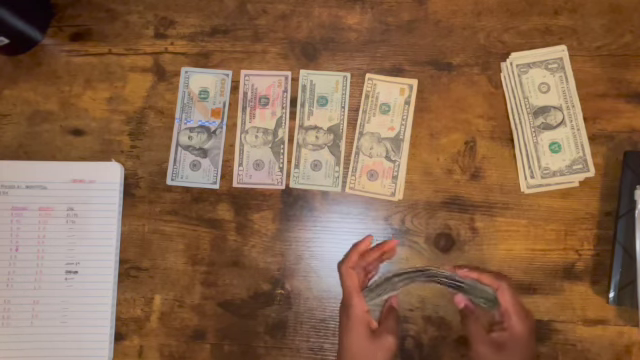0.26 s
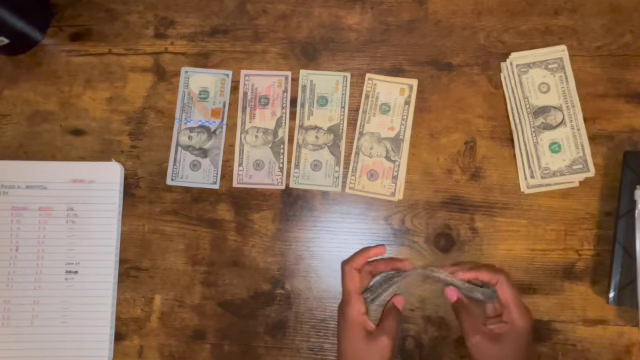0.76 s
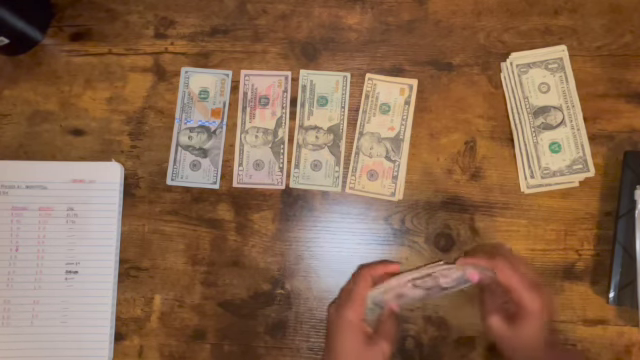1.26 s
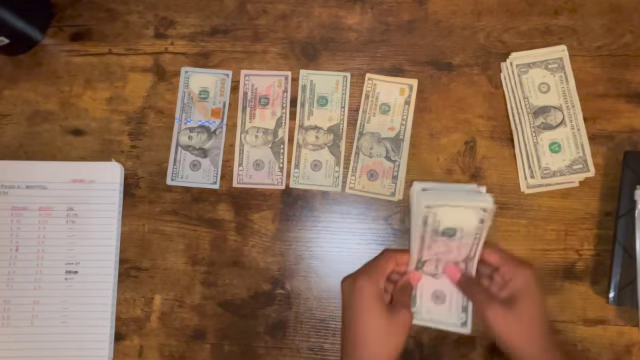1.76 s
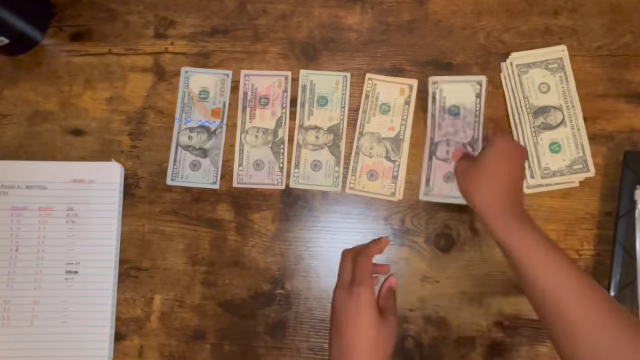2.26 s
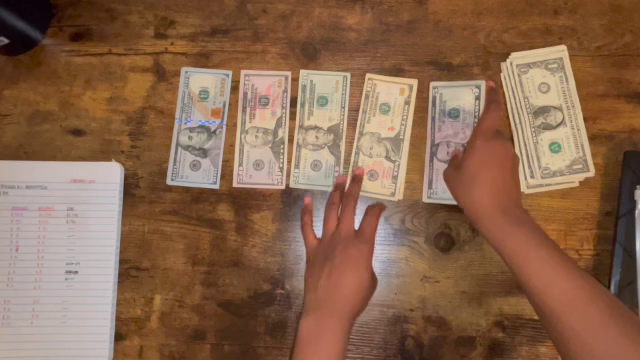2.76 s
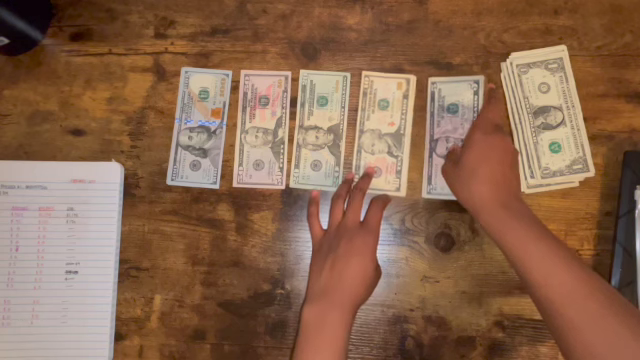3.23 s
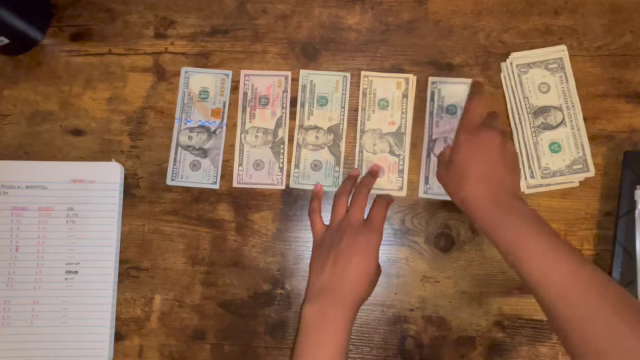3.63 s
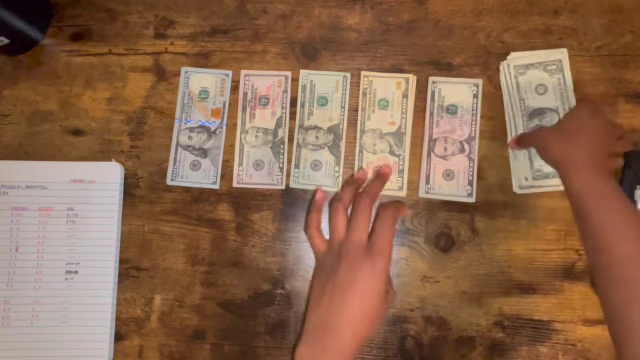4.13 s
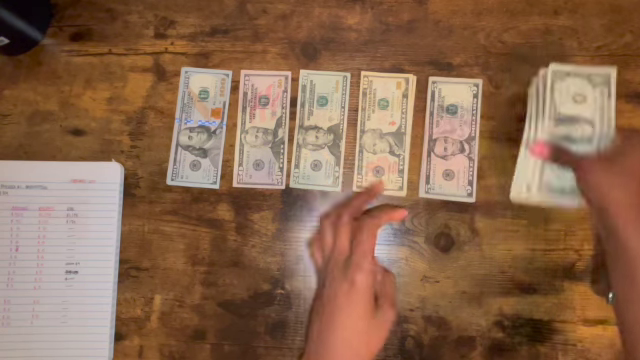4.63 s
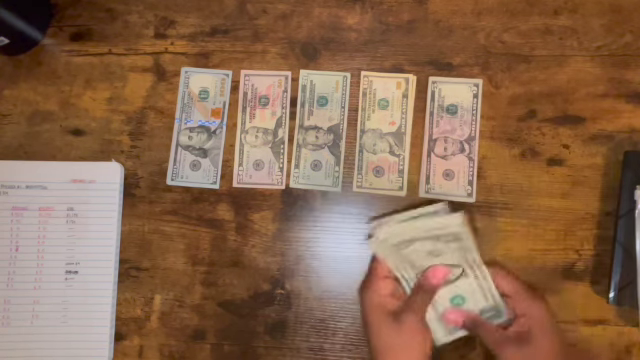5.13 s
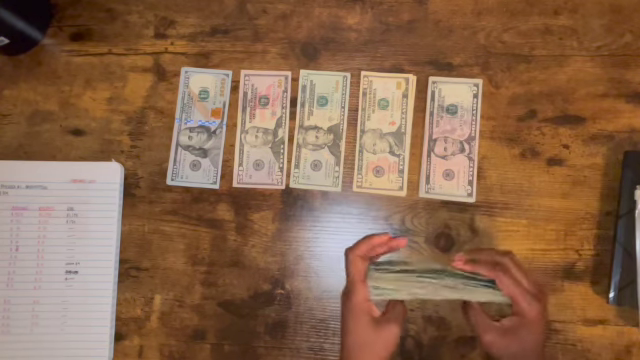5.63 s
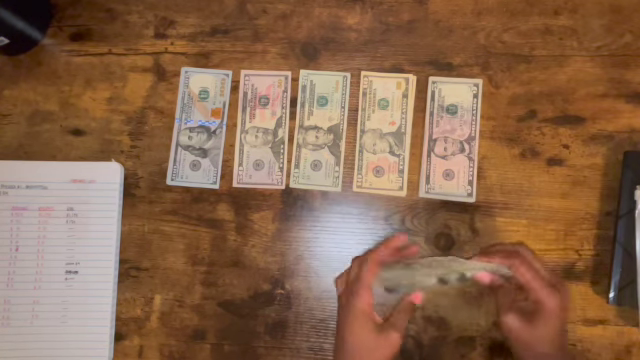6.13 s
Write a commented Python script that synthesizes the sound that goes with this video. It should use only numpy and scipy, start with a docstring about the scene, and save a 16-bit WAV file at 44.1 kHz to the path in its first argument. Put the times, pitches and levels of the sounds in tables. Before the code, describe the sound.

A quiet small room with faint low rumble, heard close in stereo. At once a stack of paper notes lands on a wooden table: a quick cluster of clicks and a low boom, with paper sliding after. A softer tap and thud come at 0.5 seconds, a sharp clack at 0.84. From 1.0 to 1.9 dry paper slides, faint crackles and small ticks. Soft finger knocks land at 2.1 and 2.4, more at 2.7 and 3.0, with fingertips dragging dully on wood. It is nearly silent until about 4.0, when firmer hand knocks press paper, strongest at 4.14. Rustles and crisp flicks follow, a bright one at 4.77, then a longer slide and faint crackle around 5.0. At 5.42 to 5.48 the second stack hits in the loudest burst of clacks with a deep woody thud and short room ring. A snap at 5.53 and light rustling carry to the end.

```python
"""Paper slides and a stack of banknotes lands on a wooden table: a quick cluster of clicks and a low boom.
The stack is squared, one note is laid down, and a second stack is picked up and squared.
Random clicks make the note edges, fading sine tones the ring after each blow, filtered random slips the paper.
Single pops make the creases. Fingers and hands knock and drag on the wood.
A small, lively room answers, heard by two closely spaced microphones."""
import sys
import numpy as np
from scipy import signal
from scipy.fft import rfft, irfft
from scipy.io import wavfile
from scipy.ndimage import uniform_filter1d

SR = 44100
rng = np.random.default_rng(int(sys.argv[2]) if len(sys.argv) > 2 else 0)


def wrap_up_sound(samples):
    """Save the sound to the file named by the first command line argument, as 16-bit audio."""
    columns = np.atleast_2d(samples).T
    # keep every value between -1 and 1, then stretch to whole-number steps
    tamed = np.clip(columns, -1, 1)
    steps = np.round(tamed * 32767).astype(np.int16)
    wavfile.write(sys.argv[1], SR, steps)


N = 282107

# Event levels below are set before each source's own overall gain.
# The stack lands on its edge:
# start_s, paper_level_db, gather_s (edges build up), spread_s (edges die out), tilt_db_per_octave, thump_level_db
STACK_TAPS = [(0.0275, -17, 0.0074, 0.005, -1, -24), (0.5303, -28, 0.00075, 0.0035, -1.5, -40),
              (0.8423, -14.5, 0.0003, 0.0036, -2, -18), (5.4229, -13, 0.017, 0.0024, 1.5, -33),
              (5.4613, -6.5, 0.0021, 0.0045, 1.5, -28), (5.4754, -11.5, 0.00082, 0.0051, -0.5, -36)]
# A hand, or the bulk of the stack, meets the table (a low pitch is a soft blow):
# start_s, level_db, pitch_hz (first finger), fingers (count), heel_level_db, pressed_paper_level_db
HAND_KNOCKS = [(0.527, -48, 204, 1, -25.5, -81), (2.134, -26.5, 157, 3, -50, -76),
               (2.363, -33, 276, 1, -35, -42), (2.703, -25, 507, 2, -31, -34.5),
               (2.978, -20, 151, 1, -54, -56), (4.014, -14.5, 283, 3, -26, -22.5),
               (4.137, -11.5, 352, 2, -11.5, -37), (4.998, -33.5, 400, 1, -36, -56),
               (5.4211, -24, 680, 2, -50, -47), (5.4407, -8, 161, 1, -48, -67)]
# A wad of notes is bent and crackles: start_s, length_s, crackle_level_db, pitch_hz (centre)
CRUMPLES = [(1.035, .06, -50.5, 1820), (1.715, 0.05, -47.5, 3200), (4.149, 0.079, -42, 2100),
            (4.957, 0.069, -43.5, 2440), (5.119, 0.036, -42, 1860)]
# A note buckles or flicks: start_s, level_db, pitch_hz (centre)
SNAPS = [(0.395, -29, 1910), (1.175, -33.5, 790), (1.2648, -34, 1430), (1.559, -31, 770),
         (1.768, -34, 5440), (2.3406, -31, 4900), (2.693, -37, 2100), (2.7047, -33.5, 2600),
         (3.6162, -36, 1870), (4.0113, -30.5, 3170), (4.1348, -24, 2300), (4.4732, -28.5, 4270),
         (4.4965, -24, 1670), (4.5535, -31.5, 5600), (4.7669, -20, 6400), (4.9976, -24.5, 2100),
         (5.5332, -19, 3440), (6.0988, -32.5, 1630), (6.298, -35, 1030)]
# Paper slides, and light, quick strokes are bright;
# the bright burst at 4.767 s is the room's answer to a flicked note:
# start_s, rise_s, hold_s, level_db, tilt_db_per_octave
SLIDES = [(.005, 0.025, 0.29, -36, -4), (.41, 0.031, 0.07, -31.5, -5), (.61, 0.049, 0.048, -41.5, 0.5),
          (.99, 0.052, 0.056, -34, -3), (1.12, 0.054, 0.034, -31, -0.5), (1.385, 0.11, 0.03, -33, 3.5),
          (1.667, 0.00049, 0.038, -38.5, 1.5), (1.712, 0.0035, 0.026, -33.5, 0.5),
          (1.81, 0.017, 0.021, -40, 0.5), (2.11, 0.029, 0.18, -47.5, -1), (2.22, 0.07, 0.017, -42.5, -0.5),
          (2.72, 0.023, 0.068, -40.5, -9.5), (3.33, 0.084, 0.028, -55, 1.5),
          (3.53, 0.084, 0.022, -47.5, -0.5), (4.065, 0.042, .06, -34.5, -1.5),
          (4.26, 0.049, 0.012, -36, -3), (4.435, 0.034, 0.086, -31.5, -1),
          (4.767, 0.0035, 0.0085, -33.5, 5), (4.912, 0.0038, 0.28, -36.5, 2),
          (4.91, 0.073, 0.027, -28.5, -2.5), (5.2, 0.054, 0.031, -30, 3.5), (5.55, 0.045, 0.069, -32, -3.5),
          (5.75, 0.03, 0.019, -47.5, -1), (5.86, 0.071, 0.1, -38.5, -1.4), (6.11, 0.059, 0.051, -47, 5),
          (6.225, 0.074, 0.087, -34.5, 2)]
# Loudness curve of fingertips dragging over the wood: time_s, level_db
DRAG_CURVE = [(2.705, -14.5), (2.76, -33), (2.82, -26), (2.9, -39), (2.96, -29), (3.08, -46.5), (3.31, -52)]
# Ringing pitches heard after the blows: the table's low boom and thin high tones of table and room:
# pitch_hz, level_db, t60_s (time to fall by 60 dB when nothing presses on the table)
RING_TONES = [(65.8, 4.5, 0.5), (116.34, 9, 0.57), (142.4, 0.5, 0.24), (184, 1.5, 0.1), (237, 1, 0.12),
              (277, -1, 0.1), (358, -4, 0.087), (507, -11, 0.066), (623.4, -19, 0.35), (1300, -9, 0.14),
              (2230, -4, 0.14), (2820, -15, 0.24), (3764, -12.5, 0.26)]
# Spectrum of note edges landing: pitch_hz, level_db (per Hz)
EDGE_SPECTRUM = [(60, -33), (200, -5.5), (450, 3.5), (850, -1.5), (1350, 4.5), (2200, 5.5), (3200, 0.5),
                 (5800, 1), (11000, -6), (16000, -21)]
# Spectrum of sliding paper: pitch_hz, level_db (per Hz)
SLIDING_SPECTRUM = [(550, 4.5), (1250, 5), (2150, 8.5), (3100, 3), (5600, 6), (11000, 1), (16000, -20)]
# Spectrum of fingertips on the wood: pitch_hz, level_db (per Hz)
FINGERTIP_SPECTRUM = [(40, -19), (110, -4), (200, 0.5), (520, 4.5), (700, -6), (1500, -18.5), (5000, -57)]
# Spectrum of the quiet room: pitch_hz, level_db (per Hz)
AIR_SPECTRUM = [(20, -28), (32, -6), (66, 3.5), (90, -6.5), (115, -6), (165, -21), (250, -12), (400, -26),
                (800, -34), (9000, -42), (16000, -56.5)]
# How long the room rings: pitch_hz, t60_s
ROOM_DECAY = [(150, 0.43), (600, 0.24), (5000, 0.25), (12000, 0.18)]
# How strongly the room answers: pitch_hz, level_db
ROOM_SEND = [(60, -2), (130, -10), (280, -5.5), (700, 3), (2000, 1.5), (5000, 0.5), (12000, -13)]
# How alike the two microphones hear spread-out sound: pitch_hz, likeness (0 unrelated, 1 the same)
ROOM_LIKENESS = [(100, 0.96), (300, 0), (1400, 0.087), (3000, 0.28), (7000, 0)]
# Left microphone's level over the right one's: pitch_hz, difference_db
BALANCE = [(40, -1.5), (120, -3), (500, -2.5), (1300, -0.5), (5000, -0.15)]

TIME = np.arange(N) / SR  # s
PULSE_SIZE = 4096  # samples
HZ = np.fft.rfftfreq(PULSE_SIZE, 1 / SR) + 1  # never zero, so logarithms are safe
THUMP_LAG_S = 0.00373  # the weight of the stack follows its first edges
BRUSH_S, BRUSH_DB, BRUSH_TILT = 0.044, -22.5, 1.8  # notes slip through the fingers just before they land
FINGER_GAP_S, FINGER_SOFTENING = 0.0145, 0.96  # each finger lands later and duller than the last
PRESS_RISE_S, PRESS_HOLD_S, PRESS_TILT = 0.0013, 0.0067, -4.5  # paper flattened under the hand
RELEASE_DB_PER_S = 226  # every stroke dies away at this rate after its hold
HEEL_LAG_S, HEEL_HZ, HEEL_RING_DB = 0.0201, 60.3, -2.5
PRESSED_HZ = 800  # pressing on the table shortens the ring, most strongly above this
FLUTTER = 0.33  # size of the flutter noise next to a full-strength pop
AIR_DB = -44
DIP_HZ, DIP_OCTAVES, DIP_DB = 7560, 0.13, -30  # a hollow in the treble of the microphones
TOP_HZ = 16150  # upper band limit


def taps(edges_per_s=6000, ring_db=-10, thump_hz=175, paper_db=1, thump_db=5, puff_db=-1):
    """The edges of the notes land one after another, then the weight of the stack pushes the table."""
    out, t = np.zeros(N), TIME[:PULSE_SIZE]
    ring = blow_ring(thud=0, pressed=False)
    for s, db, gather_s, spread_s, tilt, weight_db in STACK_TAPS:
        landed = rng.random(PULSE_SIZE) < edges_per_s / SR
        gather = 1 - np.exp(-t / max(gather_s, 1 / SR))
        fade = np.exp(-t / max(spread_s, 1 / SR))
        edges = rng.standard_normal(PULSE_SIZE) * landed * gather * fade
        colour = pulse(read(EDGE_SPECTRUM, HZ) + tilt * np.log2(np.maximum(HZ, 500) / 2000))
        clack = burst(signal.fftconvolve(edges, colour))
        add(out, s, amp(db + paper_db) * clack)
        add(out, s, amp(db + ring_db) * burst(signal.fftconvolve(clack, ring)))
        add(out, s + THUMP_LAG_S, amp(weight_db + thump_db) * blow(thump_hz))
        add(out, s + THUMP_LAG_S, amp(weight_db + puff_db) * puff())
    return out


def puff(hz=215, decay_s=0.037, steep=9):
    """The air trapped under the stack flaps out with a short, low puff."""
    t = TIME[:PULSE_SIZE]
    band = pulse(20 * np.log10((2 * HZ / hz / (1 + (HZ / hz) ** 2)) ** steep))
    return burst(signal.fftconvolve(rng.standard_normal(PULSE_SIZE) * np.exp(-t / decay_s), band))


def blow_ring(thud=3.2, thud_s=0.00058, pressed=True):
    """The answer to a click: a dead thud, the low boom of the table and fading higher tones."""
    t = TIME[:SR * 3 // 4]
    ring = thud * (1 - t / thud_s) * np.exp(-t / thud_s)
    for hz, db, t60_s in RING_TONES:
        damping = 1 + pressed * (hz / PRESSED_HZ) ** 2
        ring = ring + amp(db - 60 * t / t60_s * damping) * np.sin(2 * np.pi * hz * t)
    return ring


def blow(hz, steep=3.7):
    """A blunt push on the table; softer contact stirs only the low tones."""
    push = pulse(20 * np.log10((HZ / hz) ** steep / (1 + (HZ / hz) ** 2) ** steep))
    return burst(signal.fftconvolve(push, blow_ring()))


def knocks(level_db=3.0, fleshy=3):
    """Flesh on wood: the fingers land in turn, and the heel of the hand follows."""
    out = np.zeros(N)
    for s, db, hz, fingers, heel_db, _ in HAND_KNOCKS:
        for k in range(round(fingers)):
            finger = blow(hz * FINGER_SOFTENING ** k, steep=fleshy)
            add(out, s + k * FINGER_GAP_S, amp(db + level_db) * finger)
        add(out, s + HEEL_LAG_S, amp(heel_db + level_db) * heel())
    return out


def heel(width_s=0.00283, push_db=1):
    """The heel of the hand gives one soft shove on top of a low ring."""
    ring = amp(HEEL_RING_DB) * blow(HEEL_HZ, steep=3.0)
    u = TIME[:len(ring)] / width_s - 3  # the shove peaks three widths in
    return ring + amp(push_db) * burst((1 - u ** 2) * np.exp(-u ** 2 / 2))


def drag():
    """Fingertips stick and slip, and the table top murmurs."""
    s, db = np.transpose(DRAG_CURVE)
    slips = signal.fftconvolve(grains(per_s=400), blow_ring())[:N]
    touching = (TIME > s[0]) * (TIME < s[-1])
    return coloured(slips, FINGERTIP_SPECTRUM) * amp(np.interp(TIME, s, db)) * touching


def slides(clump_db=1.0, level_db=-4.5, crinkle_db=-9.5):
    """Paper sounds from dense, clumped slips over the whole sheet, so each microphone hears its own mix."""
    out = np.zeros((2, N))
    slow_noise = uniform_filter1d(rng.standard_normal(N), size=400)
    grip = evened(amp(clump_db * evened(slow_noise)))
    slips = grip * pair(grains(per_s=7000), grains(per_s=7700), ROOM_LIKENESS)
    slips = clumped(slips + amp(crinkle_db) * crinkle(), patch_db=3.0)
    for s, rise_s, hold_s, db, tilt in strokes():
        start = round(s * SR)
        t = TIME[:SR * 3 // 4][:N - start]
        # The sound swells, holds, and dies away.
        swell = np.sin(np.pi / 2 * np.minimum(t / rise_s, 1)) ** 2
        release_db = RELEASE_DB_PER_S * np.maximum(t - rise_s - hold_s, 0)
        stroke = swell * amp(db + level_db - release_db)
        colour = pulse(read(SLIDING_SPECTRUM, HZ) + tilt * np.log2(np.maximum(HZ, 400) / 2000))
        colour = colour / np.linalg.norm(colour)
        for ear, heard in zip(out, slips):
            add(ear, s, signal.fftconvolve(stroke * heard[start:][:len(t)], colour))
    return out


def strokes():
    """Lists the rows of SLIDES, a brush of paper before each tap, and notes pressed under a hand."""
    brushes = [(max(s - BRUSH_S, 0), BRUSH_S, 0, db + BRUSH_DB, BRUSH_TILT) for s, db, *_ in STACK_TAPS]
    presses = [(s, PRESS_RISE_S, PRESS_HOLD_S, paper_db, PRESS_TILT) for s, *_, paper_db in HAND_KNOCKS]
    return SLIDES + brushes + presses


def grains(per_s):
    """Tiny slips of random size at random moments."""
    return evened(rng.standard_normal(N) * (rng.random(N) < per_s / SR))


def crinkle(per_s=120, spread_db=4.2, ring_s=0.0015):
    """Small creases give way at random while the sheet moves; a few are larger than the rest."""
    sizes = amp(spread_db * np.minimum(rng.exponential(1, N), 3)) * (rng.random(N) < per_s / SR)
    t = TIME[:PULSE_SIZE // 8]
    return evened(signal.fftconvolve(sizes, np.exp(-t / ring_s))[:N] * rng.standard_normal(N))


def clumped(x, patch_db):
    """Small facets of the sheet catch and let go, each with its own pitch range."""
    z = signal.stft(x, nperseg=256)[2]
    patches = uniform_filter1d(rng.standard_normal(z.shape[1:]), size=9, axis=0)  # across pitch
    patches = uniform_filter1d(patches, size=3, axis=1)  # across time
    return evened(signal.istft(z * amp(patch_db * evened(patches)), nperseg=256)[1][:, :N])


def snaps(flutter_s=0.0024, width_octaves=0.77, level_db=-1, sheet_hz=1700, sheet_db=-15, sharp_db=-32):
    """A crease pops and the sheet flutters; weak pops are soft, pitched ticks, strong ones broad clicks."""
    out, t = np.zeros(N), TIME[:PULSE_SIZE // 4]
    sheet = amp(sheet_db) / (1 + np.log2(HZ / sheet_hz) ** 4)  # a sharp snap jolts the whole note too
    for s, db, hz in SNAPS:
        sharp = min(amp(db - sharp_db), 1)
        pop = FLUTTER * rng.standard_normal(len(t)) * np.exp(-t / flutter_s)
        pop[0] += sharp
        width = sharp * width_octaves * np.sqrt(max(hz / 2000, 1))
        off_centre = np.log2(HZ / hz) / width
        crease = 1 / ((1 + off_centre ** 2) * (1 + (HZ / (3 * hz)) ** 2))
        colour = pulse(20 * np.log10(sharp * sheet + crease))
        add(out, s, amp(db + level_db) * burst(signal.fftconvolve(pop, colour)))
    return out


def crumples(per_s=540, spread_octaves=0.47, cycles=2.5, size_db=3.5, lag_s=0.00023):
    """A bent wad crackles: many small creases give way, each with its own pitch, size and direction."""
    out, t = np.zeros((2, N)), TIME[:PULSE_SIZE // 8]
    for s, length_s, db, hz in CRUMPLES:
        count = max(round(per_s * length_s), 1)
        pitch, size, side = np.clip(rng.standard_normal((count, 3)), -2, 2).T
        when = (np.arange(count) + rng.random(count)) / count  # 0 to 1 through the crumple
        gains = amp(db) * evened(amp(size_db * size) * np.sqrt(np.sin(np.pi * when)))
        pitches = hz * 2 ** (spread_octaves * pitch)
        for at, gain, f, lag in zip(s + length_s * when, gains, pitches, lag_s * side):
            tick = gain * evened(np.sin(2 * np.pi * f * t) * np.exp(-f * t / cycles))
            add(out[0], at, tick)
            add(out[1], at + lag / 2, tick)
    return out


def direct(x, lag_s):
    """The straight path reaches the left microphone a little sooner."""
    delay = np.exp(-2j * np.pi * np.fft.rfftfreq(N, 1 / SR) * lag_s)
    return np.array([x, irfft(rfft(x) * delay, N)])


def stack_echo(count=3):
    """The stack throws a different clatter in each direction, and each finds its own way round the room."""
    return sum(room(taps(), early=3.45) for _ in range(count)) / np.sqrt(count)


def room(x, early, first_s=0.0042, early_s=0.0064):
    """Near surfaces answer within milliseconds; the walls follow, each band dying at its own speed."""
    t = TIME[:SR]
    echoes = rng.choice([-1., 1.], (2, SR)) * (rng.random((2, SR)) < 3000 / SR) * (t > first_s)
    hz, frame_s, z = signal.stft(echoes * (1 + early * np.exp(-t / early_s)), SR, nperseg=256)
    z = z * amp(-60 * frame_s / read(ROOM_DECAY, hz)[:, None])
    # Even out the energy of the bands before the room's own colour is applied.
    energy = uniform_filter1d((abs(z) ** 2).sum(2), size=3, axis=1)
    z /= np.sqrt(energy)[:, :, None]
    tails = signal.istft(z, SR, nperseg=256)[1][:, :SR]
    send = amp(read(ROOM_SEND, np.fft.rfftfreq(SR, 1 / SR)))
    tails = irfft(rfft(tails / np.linalg.norm(tails[0])) * send, SR)
    return signal.fftconvolve(x[None], pair(*tails, ROOM_LIKENESS), axes=1)[:, :N]


def air():
    """The low rumble and faint hiss of the quiet room."""
    noises = [coloured(x, AIR_SPECTRUM) for x in rng.standard_normal((2, N))]
    return amp(AIR_DB) * pair(*noises, ROOM_LIKENESS)


def pair(a, b, likeness):
    """Two unrelated sounds become a spread-out sound field at the two microphones."""
    c = np.clip(read(likeness, np.fft.rfftfreq(len(a), 1 / SR)), -1, 1)
    return np.array([a, irfft(c * rfft(a) + np.sqrt(1 - c ** 2) * rfft(b), len(a))])


def amp(db):
    """Decibels to gain."""
    return 10 ** (np.asarray(db) / 20)


def evened(x):
    """Scales to an average (rms) level of one."""
    return x / np.sqrt(np.mean(x ** 2) + 1e-20)


def burst(x):
    """Scales to the energy of ten milliseconds at an rms of one."""
    return x / np.linalg.norm(x) * np.sqrt(SR / 100)


def read(points, hz):
    """Reads a table along a logarithmic frequency axis."""
    f, value = np.transpose(points)
    return np.interp(np.log(hz + 1), np.log(f), value)


def add(mix, s, sound):
    """Mixes a sound in at a time in seconds."""
    part = mix[round(s * SR):][:len(sound)]
    part += sound[:len(part)]


def pulse(db):
    """The most compact pulse with this spectrum that starts at time zero (minimum phase)."""
    cepstrum = irfft(np.log(amp(np.maximum(db, -100))))
    cepstrum[1:PULSE_SIZE // 2] *= 2
    cepstrum[PULSE_SIZE // 2 + 1:] = 0
    return irfft(np.exp(rfft(cepstrum)))


def coloured(x, spectrum):
    """Filters a long signal by a spectrum and scales it to an rms of one."""
    return evened(irfft(rfft(x) * amp(read(spectrum, np.fft.rfftfreq(N, 1 / SR))), N))


def scene():
    """Stack and hands sound through the table and fill the room; loose paper is closer to the microphones."""
    stack = taps()
    hands = knocks() + drag()
    creases = snaps()
    rustle = slides() + crumples()
    wood = direct(stack + hands, lag_s=0.00003)
    wood = wood + amp(3.5) * stack_echo() + room(hands, early=0.8)
    paper = direct(creases, lag_s=0.00018) + rustle
    paper = paper + amp(-9.0) * room(creases, early=1.0) + amp(-6.5) * room(rustle[0], early=1.0)
    return amp(-3.0) * wood + paper + air()


def record(dry, low_cut_hz=38):
    """The microphones shed deep rumble and some treble, the right hears more bass; peaks clip at full scale."""
    hz = np.fft.rfftfreq(N, 1 / SR)
    tilt_db = read(BALANCE, hz)
    dip_db = DIP_DB * np.exp(-(np.log2((hz + 1) / DIP_HZ) / DIP_OCTAVES) ** 2)
    heard = irfft(rfft(dry) * amp(dip_db + np.array([tilt_db, -tilt_db]) / 2), N)
    low_cut = signal.butter(2, low_cut_hz, "high", fs=SR, output="sos")
    heard = np.clip(signal.sosfilt(low_cut, heard), -1, 1)
    band_limit = signal.firwin(511, TOP_HZ, window=("kaiser", 9), fs=SR)
    return signal.oaconvolve(heard, band_limit[None], "same")


dry = scene()
out = record(dry)
wrap_up_sound(out)
```